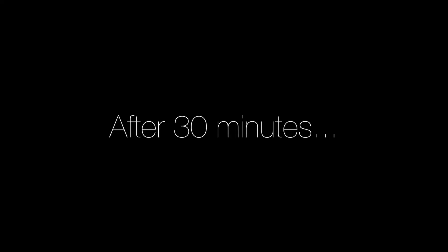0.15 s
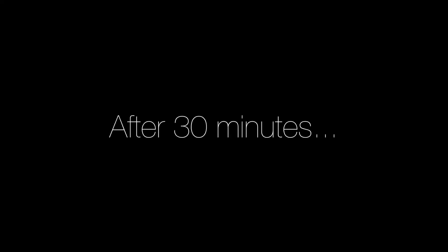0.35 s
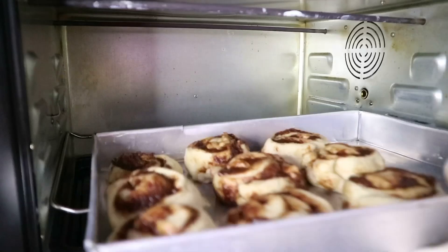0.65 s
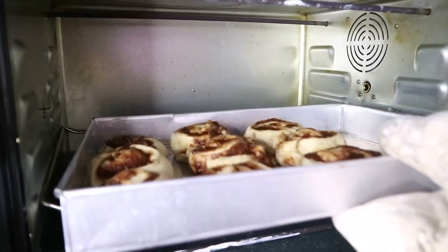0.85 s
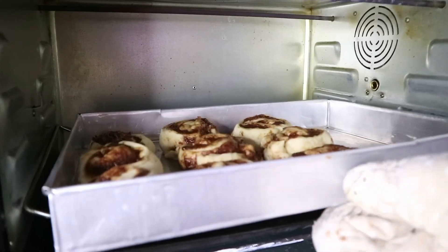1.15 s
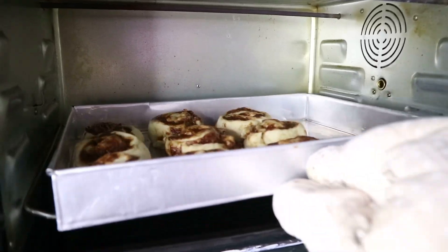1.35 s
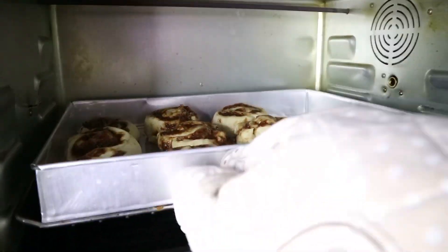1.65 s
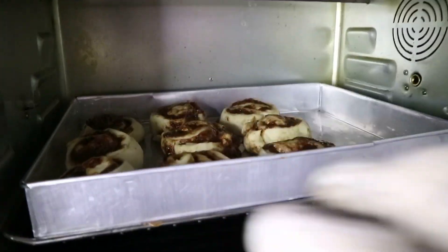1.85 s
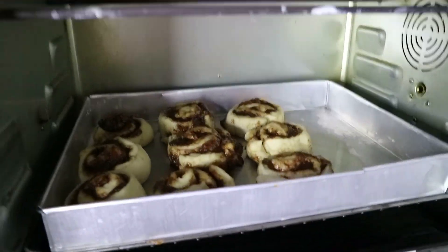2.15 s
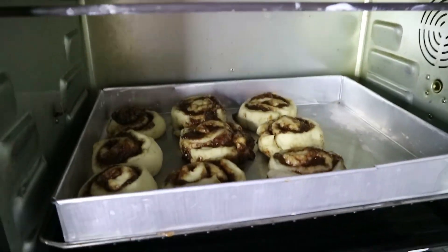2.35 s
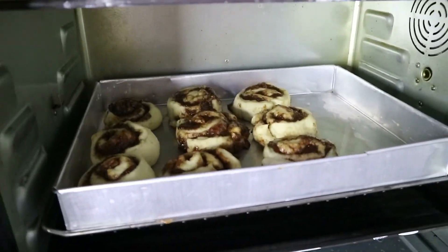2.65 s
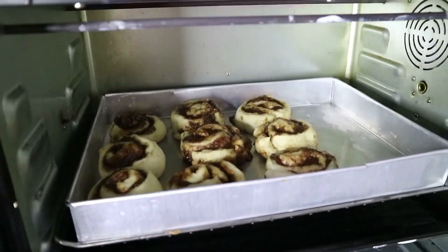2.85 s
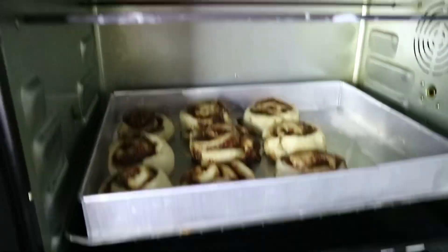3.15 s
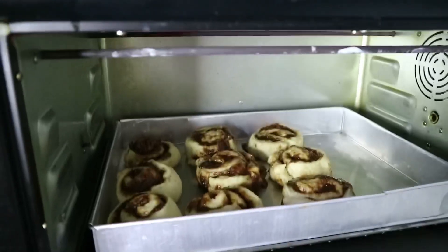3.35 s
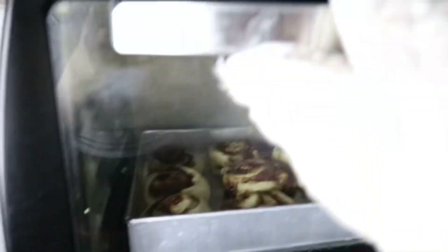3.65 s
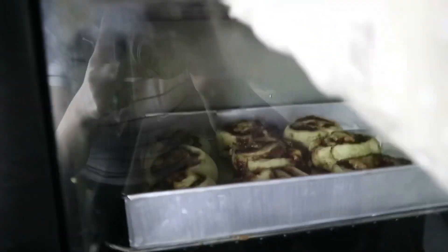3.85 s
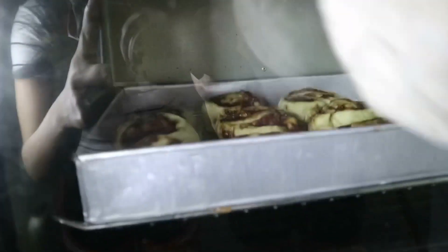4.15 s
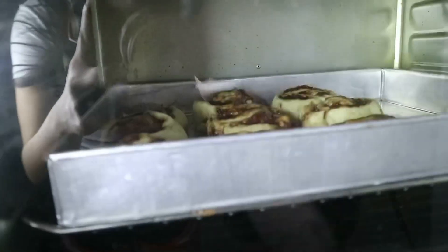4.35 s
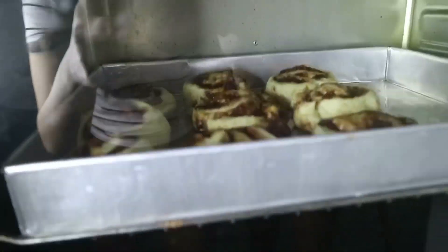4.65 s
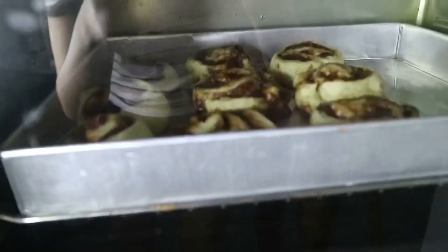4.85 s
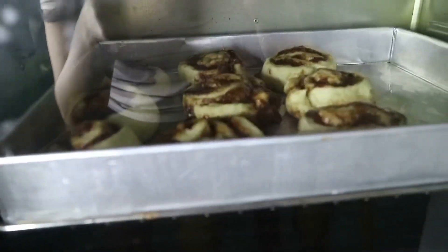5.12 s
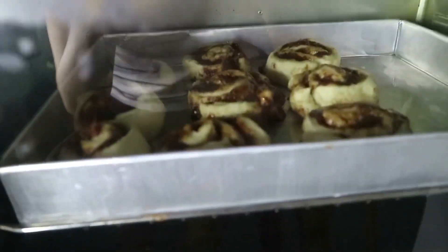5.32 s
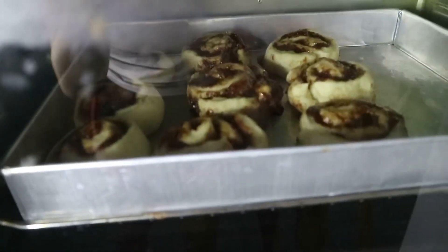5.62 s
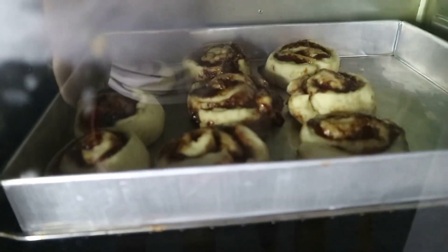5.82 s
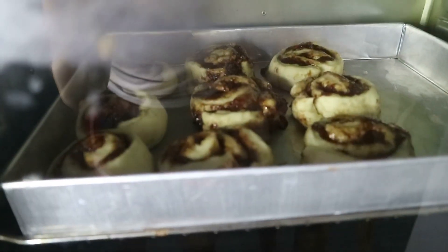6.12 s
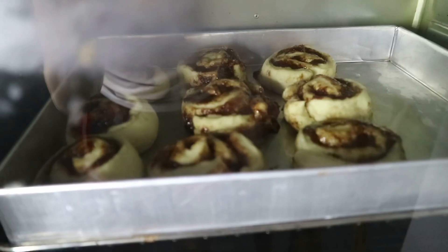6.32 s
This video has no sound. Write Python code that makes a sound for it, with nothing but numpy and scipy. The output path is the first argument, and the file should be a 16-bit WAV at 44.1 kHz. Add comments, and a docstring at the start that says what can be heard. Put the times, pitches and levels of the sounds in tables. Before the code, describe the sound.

A metal baking tray scrapes along a wire oven rack and knocks home, then a mitt bumps and the door squeaks and clicks shut over a hum.

```python
"""First, after a short silence, a metal baking tray scrapes along the wire rack of a small oven with wiry
pings and knocks home. An oven mitt bumps and brushes the door, which squeaks and clicks as it is swung
shut; the warm casing ticks. Behind lie a hum, the room's murmur and a far engine that winds down.
Struck parts are sums of dying modes with noise, rubbing is filtered slips, the engine is a stack of sines.
Two microphone ports: the right one faces the oven, the left hears it weaker and more scattered."""
import sys
import numpy as np
from scipy import signal
from scipy.fft import rfft, irfft, next_fast_len
from scipy.io import wavfile

SR = 44100
rng = np.random.default_rng(int(sys.argv[2]) if len(sys.argv) > 2 else 0)


def put_to_file(sound):
    """Save the sound as 16-bit audio at rate SR, in the file named by the first command-line argument."""
    columns = np.atleast_2d(sound).T  # one column per channel
    safe = np.clip(columns, -1, 1)
    whole_steps = np.round(safe * 32767)
    wavfile.write(sys.argv[1], SR, whole_steps.astype(np.int16))


N = 285598
TIME = np.arange(N) / SR


def from_db(db):
    """Decibels to gain."""
    return 10 ** (np.asarray(db) / 20)


def rms_one(x):
    """Scale to unit power."""
    return x / np.sqrt(np.mean(x ** 2) + 1e-20)


def in_time(rows):
    """Each column of a curve at every sample."""
    s, *columns = np.transpose(rows)
    return [np.interp(TIME, s, column) for column in columns]


def over_hz(rows, size):
    """Each column of a spectrum at every bin of a transform, joined along log frequency."""
    hz, *columns = np.transpose(rows)
    bins = np.log(np.maximum(np.fft.rfftfreq(size, 1 / SR), 1))
    return [np.interp(bins, np.log(hz), column) for column in columns]


def low_pass(x, order, top_hz):
    """Remove what lies above an edge."""
    return signal.sosfilt(signal.butter(order, top_hz, fs=SR, output="sos"), x)


def coloured(x, colour):
    """Give a noise-like signal a spectrum; unit power."""
    size = next_fast_len(len(x))
    gain = from_db(over_hz(colour, size)[0])
    return rms_one(irfft(rfft(x, size) * gain, size)[:len(x)])


def noise(colour, size=N):
    """Coloured noise of unit power."""
    return coloured(rng.standard_normal(size), colour)


def drift(per_s):
    """Smooth random wander of unit power."""
    size = next_fast_len(N)
    smoothing = (1 + (np.fft.rfftfreq(size, 1 / SR) / per_s) ** 2) ** 2
    return rms_one(irfft(rfft(rng.standard_normal(size)) / smoothing, size)[:N])


def dying(t, t60):
    """Falls by 60 dB in t60 seconds."""
    return np.exp(-np.log(1000) * t / t60)


def resonate(x, hz, width_hz):
    """A two-pole resonance with gain 1 at its peak."""
    r = np.exp(-np.pi * width_hz / SR)
    poles = [1, -2 * r * np.cos(2 * np.pi * hz / SR), r * r]
    return signal.lfilter((1 - r * r) / 2 * np.array([1, 0, -1]), poles, x)


def rough_tone(hz, width_hz):
    """A narrow band of noise around a pitch, fixed or moving."""
    turn = 2 * np.pi * np.cumsum(hz * np.ones(N)) / SR
    return drift(width_hz) * np.cos(turn) + drift(width_hz) * np.sin(turn)


def add(out, s, db, sound):
    """Place a struck sound at a time; its level is that of the first 20 ms."""
    at = int(s * SR)
    gain = from_db(db) / np.std(sound[:SR // 50])
    out[at:at + len(sound)] += sound[:N - at] * gain


def ring(modes, spread_db=3.3):
    """Clear dying modes, each with a strength drawn at random around its level."""
    t = TIME[:SR]
    out = 0
    for k, (hz, db, t60) in enumerate(modes):
        strength = from_db(db + spread_db * rng.standard_normal())
        out = out + (-1) ** k * strength * np.sin(2 * np.pi * hz * t) * dying(t, t60)
    return out


def body(modes, colour, crack_t60, tail_db, tail_t60, tail_top_hz, modes_db, prompt_db,
         attack_s=0.00024, build_s=0.0031):
    """One blow: a crack, the clear modes, and a duller tail that builds up in the oven box and the room."""
    t = TIME[:int(.7 * SR)]
    crack = noise(colour, size=len(t)) * dying(t, crack_t60)
    tail = low_pass(noise(colour, size=len(t)), 1, tail_top_hz)
    tail = from_db(tail_db) * tail * dying(t, tail_t60) * (1 - np.exp(-t / build_s))
    clear = 0
    for k, (hz, db, t60) in enumerate(modes):
        strength = from_db(db + 2 * rng.standard_normal())   # drawn at random around its level
        # most energy leaks quickly through the contact
        fading = dying(t, t60) + from_db(prompt_db) * dying(t, t60 / 5)
        clear = clear + (-1) ** k * strength * np.sin(2 * np.pi * hz * t) * fading
    return (crack + tail + from_db(modes_db) * clear) * (1 - np.exp(-t / attack_s))


def blows(rows, response):
    """Each contact excites only a band of the body."""
    out = np.zeros(N)
    for s, db, low_hz, top_hz in rows:
        band = signal.butter(2, [low_hz, top_hz], "band", fs=SR, output="sos")
        add(out, s, db, signal.sosfilt(band, response()))
    return out


def reflected(x, scatter_t60=0.1):
    """A short burst of echoes from the oven walls, of unit energy."""
    length = SR // 2
    echoes = rng.standard_normal(length) * dying(TIME[:length], scatter_t60)
    return signal.fftconvolve(x, echoes / np.linalg.norm(echoes))[:N]


def boxed(x, echo_db=-7, echo_t60=0.088):
    """Early echoes between the oven walls put a fine ripple on the spectrum."""
    echo_gain = from_db(echo_db)
    return (x + echo_gain * reflected(x, scatter_t60=echo_t60)) / np.hypot(1, echo_gain)


# hum tones of the appliances: f/Hz, level/dB
HUM_TONES = [(121, -56), (242, -47), (258, -50), (393, -57.5)]
# spectrum of the room's murmur: f/Hz, relative level per Hz/dB
MURMUR_COLOUR = [(25, -23), (48, -17), (75, -7), (130, 2.5), (240, 4), (330, -1), (450, 1.5), (700, -7),
                 (1100, -12), (2200, -21.5), (4200, -32), (9500, -39), (12500, -49), (15500, -56)]


def room(waver_db=2.35, murmur_db=-40.5):
    """Appliances in the room hum with a wavering level over a steady murmur."""
    hum = 0
    for hz, db in HUM_TONES:
        tone = np.sqrt(2) * np.sin(2 * np.pi * (hz * TIME + rng.random()))
        hum = hum + from_db(db + waver_db * drift(3.4)) * tone
    return hum + from_db(murmur_db) * noise(MURMUR_COLOUR)


ENGINE_TOP_HZ, ENGINE_IDLE_HZ = 35.28, 26.55   # firing rates
ENGINE_CLIMB_HZ_PER_S, ENGINE_COAST_S = 2.1, 1.1
ENGINE_HOLD_FROM_S, ENGINE_HOLD_TO_S = 2.8, 4.3


def firing_rate():
    """Firings per second: a steady climb, a hold and a slow coast towards idle."""
    climb = ENGINE_CLIMB_HZ_PER_S * np.minimum(TIME - ENGINE_HOLD_FROM_S, 0)
    coast = np.exp(-np.maximum(TIME - ENGINE_HOLD_TO_S, 0) / ENGINE_COAST_S)
    return ENGINE_IDLE_HZ + (ENGINE_TOP_HZ - ENGINE_IDLE_HZ) * coast + climb


# partials of the engine: multiple of the firing rate, relative level/dB
ENGINE_PARTIALS = [(2, -4.5), (3, -0.5), (4, -5), (5, 3.5), (6, 7), (7, -26), (8, 11), (11, -28),
                   (13, 15.5), (16, -5)]
# pitches the room favours as the partials glide through: f/Hz, gain/dB
ENGINE_ROOM_GAIN = [(52, -3), (62, -2), (70, -2), (79, 12), (88, -3), (98, -18), (108, -3), (120, -1.5),
                    (132, 7), (143, -4.5), (178, -16.5), (194, -27), (212, -7), (245, -23.5)]
# how strongly the distant engine comes through: t/s, gain/dB
ENGINE_STRENGTH = [(.6, -56), (1.3, -59), (2.0, -50.5), (2.8, -42.5), (3.7, -45.5), (4.7, -41),
                   (6.48, -51.5)]


def engine(fading_db=2.5, wobble=0.003):
    """Far off: only low multiples of the firing rate come through the walls, each fading in and out."""
    firings = firing_rate()
    turn = 2 * np.pi * np.cumsum(firings * (1 + wobble * drift(10.2))) / SR
    out = 0
    for multiple, db in ENGINE_PARTIALS:
        room_db = np.interp(multiple * firings, *np.transpose(ENGINE_ROOM_GAIN))
        gain = from_db(db + room_db + fading_db * drift(3))
        out = out + gain * np.sin(multiple * turn + 2 * np.pi * rng.random())
    return from_db(in_time(ENGINE_STRENGTH)[0]) * out


# course of the whirr: t/s, level/dB, centre f/Hz
WHIRR_COURSE = [(4.6, -66, 2200), (5.35, -54.5, 2186), (6.0, -53.5, 2070), (6.48, -73, 2020)]


def whirr(wander_hz=45, wanders_per_s=7):
    """A faint, diffuse pitch that wavers and sinks inside the wash."""
    db, hz = in_time(WHIRR_COURSE)
    return from_db(db) * rough_tone(hz + wander_hz * drift(wanders_per_s), width_hz=260)


WASH_START_S, WASH_RISE_S = 4.033, 0.1
WASH_DB, WASH_GROWTH_DB_PER_S = -50.5, 1.4
WASH_TOP_DB, WASH_TOP_RISE_S, WASH_TOP_FADE_DB_PER_S = -45, 0.41, 10.5
# spectrum of the body of the wash: f/Hz, relative level per Hz/dB
WASH_BODY_COLOUR = [(400, -21), (750, 7), (1050, -0.5), (1400, 7), (1750, -3.5), (2150, -1.5), (3000, -5.5),
                    (4500, -14.5), (8000, -38.5)]
# spectrum of the top of the wash: f/Hz, relative level per Hz/dB
WASH_TREBLE_COLOUR = [(2500, -2), (4500, 2), (6500, 0), (9500, -4), (12000, -7), (15500, -18)]


def wash(flutter_db=1.2):
    """A smooth hiss swells, then dulls: its body keeps growing while its top fades."""
    t = np.maximum(TIME - WASH_START_S, 0)
    low = from_db(WASH_DB + WASH_GROWTH_DB_PER_S * t) * (1 - np.exp(-t / WASH_RISE_S))
    top = from_db(WASH_TOP_DB - WASH_TOP_FADE_DB_PER_S * t) * (1 - np.exp(-t / WASH_TOP_RISE_S))
    hiss = low * noise(WASH_BODY_COLOUR) + top * noise(WASH_TREBLE_COLOUR)
    return from_db(flutter_db * drift(7.4)) * hiss


# modes of the broad oven panels: f/Hz, relative level/dB, t60/s
OVEN_PANEL_MODES = [(98, -7, .3), (118, 1.5, 0.25), (143, 4, 0.24), (219.4, 7, 0.35), (259, 2, 0.17),
                    (312, -5.5, 0.33), (421.4, 2, 0.68), (512, 6, 0.34), (572, -0.5, 0.35),
                    (645, 2.5, 0.31)]
# the crowd of weaker panel modes: f/Hz, relative level per Hz/dB
OVEN_PANEL_COLOUR = [(50, -22), (140, 9.5), (270, 0), (345, -8), (420, 7), (600, -19), (850, -8),
                     (1400, -9.5), (3300, -13), (5000, -30), (15000, -49)]


def door_bump():
    """The broad panels, moved by a padded hand."""
    return body(OVEN_PANEL_MODES, OVEN_PANEL_COLOUR, crack_t60=0.3, tail_db=-4.0, tail_t60=0.49,
                tail_top_hz=4000, modes_db=-12.5, prompt_db=8, attack_s=0.0011)


# soft bumps of the mitt on the oven: t/s, level/dB, contact low edge f/Hz, contact top edge f/Hz
MITT_CONTACTS = [(2.3178, -23, 110, 5200), (2.323, -22, 85, 260), (2.337, -26.5, 170, 3200),
                 (2.349, -26, 189, 520), (2.358, -25, 130, 704), (2.376, -27, 180, 480),
                 (2.367, -31, 260, 2200), (2.387, -24, 139, 300), (2.405, -32.5, 380, 800),
                 (2.416, -31, 140, 450), (2.43, -41, 110, 420), (2.472, -47, 120, 320),
                 (5.085, -29.5, 242, 340), (5.105, -32.5, 268, 346), (5.124, -37, 263, 370)]


def mitt_bumps():
    """The mitt judders unevenly on the panel."""
    return blows(MITT_CONTACTS, door_bump)


# thin squeaks as the door closes: start t/s, length/s, starting f/Hz, peak level/dB
DOOR_SQUEAKS = [(3.812, 0.25, 6800, -64.5), (3.951, 0.067, 10200, -63)]


def squeak(catch_db=5.0, catches_per_s=45, climb=0.091):
    """Dry sliding contacts that catch and let go; their pitch climbs as the door tightens."""
    out = 0
    for start, length, hz, db in DOOR_SQUEAKS:
        progress = np.clip((TIME - start) / length, 0, 1)
        tone = rough_tone(hz * (1 + climb * progress), width_hz=660)
        out = out + from_db(db) * np.sin(np.pi * progress) * tone
    return out * from_db(catch_db * drift(catches_per_s))


# modes of the door: f/Hz, relative level/dB, t60/s
OVEN_DOOR_MODES = [(408, -7, 0.47), (515.5, 7, 0.37), (600, 4, 0.2), (747, 7, 0.19), (786, 2.5, 0.09),
                   (906, 1, 0.25), (1040, -2.5, 0.15), (1285, -4, 0.3), (2080, 0.5, 0.094),
                   (2398, -1, 0.08), (3370, -13, 0.083), (4110, -8, 0.054)]
# the crowd of weaker door modes: f/Hz, relative level per Hz/dB
OVEN_DOOR_COLOUR = [(100, -12), (250, 15), (600, 11), (1200, 4), (2400, -4), (3300, -7), (4400, -14),
                    (5300, -16), (7500, -14), (11000, -21), (15000, -48)]


def door_click():
    """Glass door and steel casing."""
    return body(OVEN_DOOR_MODES, OVEN_DOOR_COLOUR, crack_t60=0.028, tail_db=-11.0, tail_t60=0.29,
                tail_top_hz=1190, modes_db=-22.5, prompt_db=-1)


# the door snaps and the casing rattles in answer: t/s, snap level/dB, snap low edge f/Hz,
# snap top edge f/Hz, rattle level/dB, loss per rebound/dB, ring level/dB, pitch factor, length factor
DOOR_SNAPS = [(3.0697, -27.5, 1130, 4400, -33.5, 5, -32.5, 1.01, 0.57),
              (3.9677, -28, 1620, 4200, -28, 9, -29.5, 0.98, 0.75),
              (5.195, -29, 483, 2000, -52, -2.5, -41, 1.4, 0.54),
              (6.1215, -27, 696, 1690, -35.5, 1, -37, 1.1, 0.82)]
# small contacts of door and warm casing: t/s, level/dB, contact low edge f/Hz, contact top edge f/Hz
SMALL_TICKS = [(2.19, -57, 3070, 7200), (3.0712, -37, 3200, 4700), (3.0745, -42, 1900, 4000),
               (3.345, -58, 3480, 10100), (3.9682, -41, 3800, 4930), (3.974, -39.5, 1470, 2680),
               (3.998, -35, 444, 800), (4.031, -45, 1200, 2800), (4.047, -39, 440, 644),
               (4.082, -40, 400, 620), (4.098, -49, 426, 716), (4.777, -50, 2880, 7200),
               (5.209, -37.5, 700, 2870), (5.357, -54.5, 3100, 7100), (5.65, -55, 3070, 7200),
               (6.129, -39.5, 1400, 3800), (6.145, -39, 600, 2600), (6.179, -40, 700, 1500),
               (6.215, -43, 700, 4560)]
REBOUND_S, REBOUND_LOW_HZ, REBOUND_TOP_HZ = .0058, 370, 1260   # delay of the first rebound, contact edges


def door_clicks(rebounds=4, ring_top_hz=950):
    """A bright snap, a run of dull rebounds and the lingering ring of the door; small ticks in between."""
    contacts, ringing = list(SMALL_TICKS), np.zeros(N)
    for s, db, low_hz, top_hz, rattle_db, loss_db, ring_db, pitch, length in DOOR_SNAPS:
        contacts.append((s, db, low_hz, top_hz))
        for k in range(rebounds):
            rebound_s = s + REBOUND_S * (k + 1) ** 2   # ever wider gaps
            contacts.append((rebound_s, rattle_db - k * loss_db, REBOUND_LOW_HZ, REBOUND_TOP_HZ))
        # each snap has its own pitch and length of ring
        modes = [(hz * pitch, level_db, t60 * length) for hz, level_db, t60 in OVEN_DOOR_MODES]
        add(ringing, s + REBOUND_S, ring_db, low_pass(ring(modes), 2, ring_top_hz))
    return blows(contacts, door_click) + ringing


STROKE_GROWTH_DB_PER_S, STROKE_RELEASE_DB_PER_S = 2, 70   # the release works against the growth
# sliding strokes, first the tray on the rack, then the mitt on the door:
# start t/s, length/s, rise/s, friction level/dB, fine hiss level/dB
SLIDING_STROKES = [(0.585, 0.22, 0.025, -39.5, -49.5), (0.771, 0.19, 0.13, -38, -43.5),
                   (1.135, 0.27, 0.039, -40.5, -44.5), (1.657, 0.077, 0.042, -44, -63),
                   (2.176, 0.43, 0.28, -36, -41.5), (2.649, 0.21, 0.099, -38, -44.5),
                   (2.9, 0.17, 0.062, -46.5, -58.5), (3.378, 0.12, 0.07, -44, -58.5),
                   (3.56, 0.11, 0.33, -44, -51.5), (3.879, 0.048, 0.052, -44.5, -58)]


def stroke_gains():
    """Gains of friction and fine hiss: each stroke rises, swells slightly and dies away."""
    power = np.zeros((2, N))
    for start, length, rise, friction_db, fine_db in SLIDING_STROKES:
        t = TIME - start
        growth_db = STROKE_GROWTH_DB_PER_S * np.maximum(t - rise, 0)
        release_db = STROKE_RELEASE_DB_PER_S * np.maximum(t - length, 0)
        shape = np.clip(t / rise, 0, 1) * from_db(growth_db - release_db)
        power += (from_db([[friction_db], [fine_db]]) * shape) ** 2
    return np.sqrt(power)


# resonances of the oven that rubbing wakes: f/Hz, width/Hz, relative level/dB
RUBBED_RESONANCES = [(628, 86, 3.5), (919, 31, 11.5), (1356, 110, -1.5), (1873, 32, 8), (2170, 430, -9.5),
                     (2494, 88, 3), (2940, 49, -5), (4060, 47, -1), (4330, 100, -27), (6570, 110, -8)]
# spectrum of the swish: f/Hz, relative level per Hz/dB
SWISH_COLOUR = [(380, -3.5), (580, 13.5), (800, 1), (1200, -3.5), (2100, -1.5), (3100, -4), (4400, -10.5),
                (6000, -25), (12000, -42)]
# spectrum of the fine hiss: f/Hz, relative level per Hz/dB
FINE_HISS_COLOUR = [(2500, -1), (4500, -1), (6700, -4.5), (9000, -8), (12000, -16.5), (15500, -26)]


def rubbing(slips_per_s=2200, spread_db=4.0, flutter_db=1.54, swish_db=-3.5, ring_db=-5.5):
    """Countless tiny slips make a grainy swish and keep the metal ringing faintly."""
    friction, fine = stroke_gains()
    sizes = from_db(spread_db * np.minimum(rng.exponential(1, N), 5)) * rng.choice([-1, 1], N)
    slips = sizes * (rng.random(N) < slips_per_s / SR)
    ringing = 0
    for k, (hz, width_hz, db) in enumerate(RUBBED_RESONANCES):
        ringing = ringing + (-1) ** k * from_db(db) * resonate(slips, hz, width_hz)
    swish = from_db(swish_db) * coloured(slips, SWISH_COLOUR)
    scrape = swish + from_db(ring_db) * rms_one(ringing)
    return from_db(flutter_db * drift(37)) * (friction * scrape + fine * noise(FINE_HISS_COLOUR))


# spectrum of the crackle: f/Hz, relative level per Hz/dB
CRACKLE_COLOUR = [(900, 11), (1600, -0.5), (3000, 2.5), (4500, -7), (7000, -8), (12000, -27.5)]


def grit(grains_per_s=160, clump_db=6, clumps_per_s=25, spread_db=-2.0, grit_db=-8):
    """Rough spots catch in uneven clumps and crackle on top of the swish."""
    sizes = from_db(spread_db * np.minimum(rng.exponential(1, N), 3)) * rng.choice([-1, 1], N)
    rate = grains_per_s * from_db(clump_db * drift(clumps_per_s))
    caught = rng.random(N) < rate / SR
    crackle = coloured(reflected(sizes * caught, scatter_t60=0.028), CRACKLE_COLOUR)
    return from_db(grit_db) * stroke_gains()[0] * crackle


# short rasps within the sliding strokes:
# start t/s, length/s, starting f/Hz, final f/Hz, width/Hz, peak level/dB
SHORT_RASPS = [(1.16, .09, 4300, 4000, 650, -43), (2.44, 0.088, 3700, 2325, 1110, -38),
               (2.52, 0.093, 2575, 1900, 800, -37), (2.739, .06, 2406, 1815, 900, -42),
               (2.952, 0.057, 1284, 907, 900, -40.5)]


def rasps():
    """Short rasps within the sliding strokes: narrow bands of noise, each falling in pitch."""
    out = 0
    for start, length, from_hz, to_hz, width_hz, db in SHORT_RASPS:
        progress = np.clip((TIME - start) / length, 0, 1)
        tone = rough_tone(from_hz + (to_hz - from_hz) * progress, width_hz=width_hz)
        out = out + from_db(db) * np.sin(np.pi * progress) * tone
    return out


# modes of the thin tray: f/Hz, relative level/dB, t60/s
BAKING_TRAY_MODES = [(222, -0.5, 0.67), (253.4, 2.5, 0.49), (411, -16, 0.16), (509, -2.5, 0.29),
                     (595.5, -0.5, 0.32), (850, 0, 0.27), (880, -8, 0.086), (1360, 2.5, 0.048),
                     (1922, 0, 0.092), (2056, -9, 0.091), (2840, -7, 0.05), (3220, -2, 0.083),
                     (3510, 1.5, 0.041), (3900, -5, 0.049), (4620, -8, 0.066), (4970, -5, 0.08),
                     (6592, -4, 0.1), (6970, -3, 0.055), (7000, -12, 0.06), (7780, -11, 0.14),
                     (8420, -16, .1)]
# the crowd of weaker tray modes, also the colour of the wiry ticks: f/Hz, relative level per Hz/dB
BAKING_TRAY_COLOUR = [(70, -6), (140, 6), (250, -7), (350, 1.5), (650, 3.5), (900, 0.5), (1200, -6),
                      (2000, -7), (3500, -12.5), (5800, -14.5), (7000, -15.5), (10000, -19), (15000, -34)]


def tray_blow():
    """Thin metal on wire."""
    return body(BAKING_TRAY_MODES, BAKING_TRAY_COLOUR, crack_t60=0.035, tail_db=-9, tail_t60=0.31,
                tail_top_hz=6140, modes_db=-15.5, prompt_db=3.5)


# wiry pings: the tray sliding and landing, then small catches during the later brushing:
# t/s, level/dB, pitch f/Hz, brightness/dB per octave
WIRY_PINGS = [(.6458, -41, 570, -2), (.6917, -44, 576, -3), (.768, -48, 650, -8), (.7959, -48, 636, 0),
              (.831, -30.5, 622, -1), (.8807, -52, 670, 6), (.953, -52, 620, 0), (1.169, -45, 917, 2),
              (1.2918, -58, 733, 2), (1.315, -32, 537, 0), (1.4222, -25.5, 717, -3.5),
              (1.4283, -19.5, 707, -9), (1.501, -29, 697, -18), (2.249, -39.5, 509, -3),
              (2.484, -40, 630, 8.5), (2.672, -43.5, 518, 6), (2.775, -41, 457, 4), (2.983, -43, 478, -10),
              (3.034, -43, 468, -4)]
# bending modes of a wire: multiple of its pitch, relative level/dB, t60/s
WIRE_BENDING_MODES = [(1, 2.5, 0.12), (2.58, 2.5, 0.097), (3.16, 0.5, 0.075), (4.9, 5, 0.067),
                      (5.9, -18, 0.06), (7.9, -22, 0.063)]


def wire_pings(tick_db=-8, tick_t60=0.023, low_hz=1500, top_hz=5000):
    """Each ping is a noisy tick and a ring like that of a thin bar."""
    t = TIME[:SR // 4]

    def tick():
        """A burst of dying noise."""
        return noise(BAKING_TRAY_COLOUR, size=len(t)) * dying(t, tick_t60)

    ticks = [(s, db + tick_db + tilt_db, low_hz, top_hz) for s, db, _, tilt_db in WIRY_PINGS]
    out = blows(ticks, tick)
    for s, db, hz, tilt_db in WIRY_PINGS:
        modes = [(hz * multiple, level_db + tilt_db * np.log2(multiple), t60)
                 for multiple, level_db, t60 in WIRE_BENDING_MODES]
        add(out, s, db, ring(modes))
    return out


# tray on the rack: t/s, level/dB, contact low edge f/Hz, contact top edge f/Hz
TRAY_CONTACTS = [(.8305, -39.5, 1400, 3400), (1.316, -38, 2580, 7050), (1.4185, -24, 250, 2500),
                 (1.4218, -21.5, 420, 2400), (1.429, -19, 197, 1500), (1.4305, -33.5, 2500, 7040),
                 (1.4405, -16.5, 350, 15500), (1.4445, -25, 3040, 4180), (1.4515, -20, 200, 680),
                 (1.453, -30, 1800, 7050), (1.4645, -34.5, 1300, 4200), (1.4915, -26.5, 460, 2980),
                 (1.4955, -25, 1190, 3600), (1.4985, -27, 1290, 10500), (1.502, -27.5, 1700, 4800),
                 (1.5115, -34.5, 600, 4200), (1.5375, -49, 1200, 2630), (1.556, -31.5, 230, 750),
                 (1.573, -51, 2400, 4300)]


def tray_knocks():
    """The edge strikes the wires, and the tray drops flat and chatters."""
    return blows(TRAY_CONTACTS, tray_blow)


# left microphone port against the right: f/Hz, level/dB, phase/rad, share of direct sound (0-1)
LEFT_AGAINST_RIGHT = [(50, -1, -2, 0.88), (128, -2, -2, 0.88), (209, -7, -3, 0.97), (414, -10.5, -2.5, 1),
                      (700, -6.5, -4.5, 0.81), (1510, -6.5, -4.5, 1), (4560, -6.5, -4, 0.25),
                      (7800, -6.5, -3.5, 0), (14300, -6, -1, 0.18)]


def microphones(front, scattered):
    """The right port faces the oven; the left hears it weaker, shifted in phase, with scattered sound."""
    size = next_fast_len(N + SR)
    level_db, phase, direct = over_hz(LEFT_AGAINST_RIGHT, size)
    left = direct * np.exp(1j * phase) * rfft(front, size)
    left = left + np.sqrt(1 - direct ** 2) * rfft(scattered, size)
    return np.array([irfft(from_db(level_db) * left, size)[:N], front])


def scene():
    """Tray, door and background at the two microphones; each part of the oven has its own echoes."""
    door = door_clicks() + mitt_bumps() + squeak()
    parts = [tray_knocks(), wire_pings(), rasps() + grit(), door]
    front = sum(parts) + boxed(rubbing() + wash()) + whirr() + engine() + room()
    # spread-out noises differ from one direction to the next, so they are drawn afresh
    scattered = sum(reflected(part) for part in parts) + boxed(rubbing() + wash()) + room()
    return microphones(front, scattered)


def record(dry, start_s=.600, rise_s=0.0087, cutoff_hz=15700):
    """Silence until the sound is switched in with a brief ramp; a steep low-pass cuts the top."""
    switched_in = np.clip((TIME - start_s) / rise_s, 0, 1)
    top_cut = signal.ellip(10, .2, 80, cutoff_hz, fs=SR, output="sos")
    return signal.sosfilt(top_cut, dry * switched_in)


dry = scene()
out = record(dry)
put_to_file(out)
```